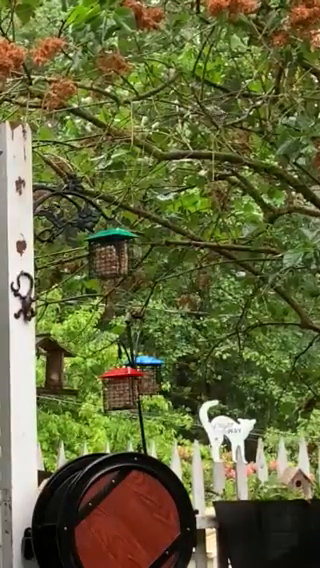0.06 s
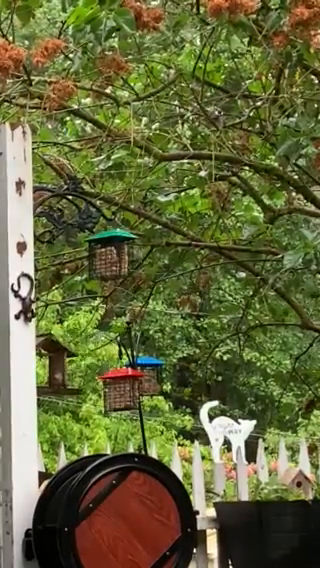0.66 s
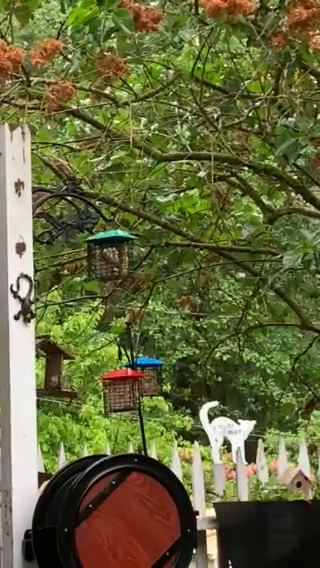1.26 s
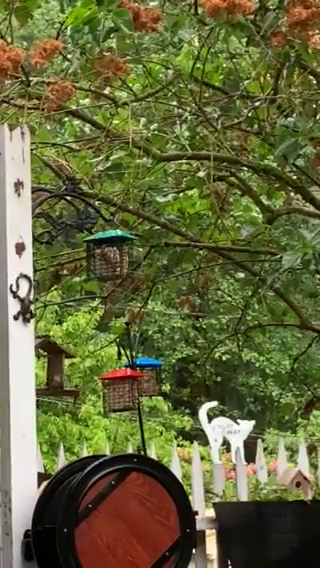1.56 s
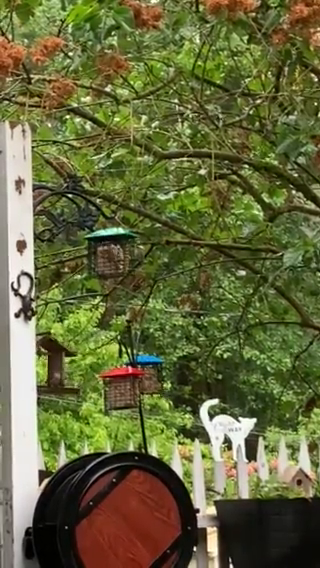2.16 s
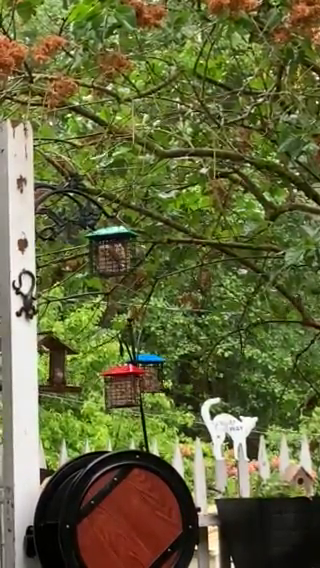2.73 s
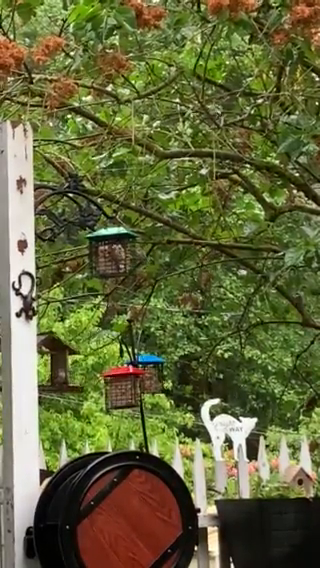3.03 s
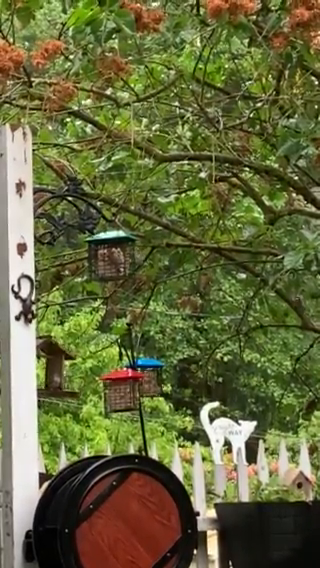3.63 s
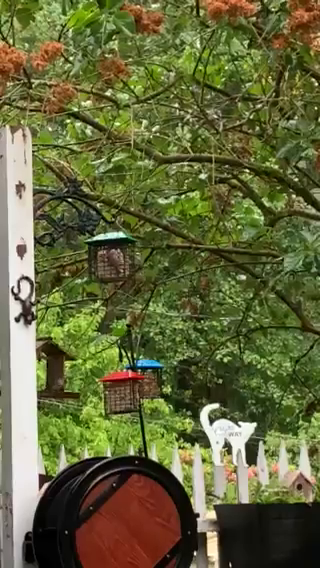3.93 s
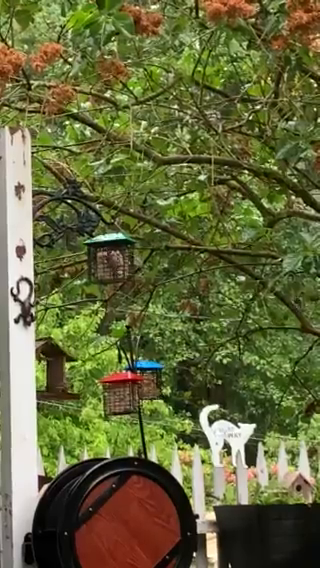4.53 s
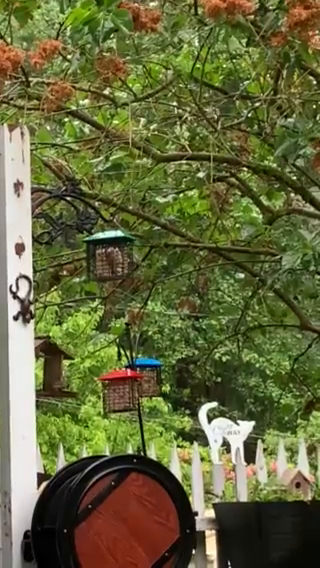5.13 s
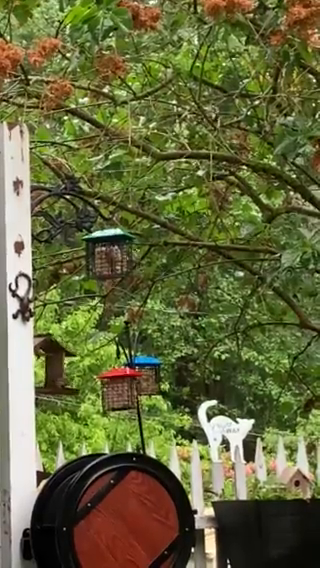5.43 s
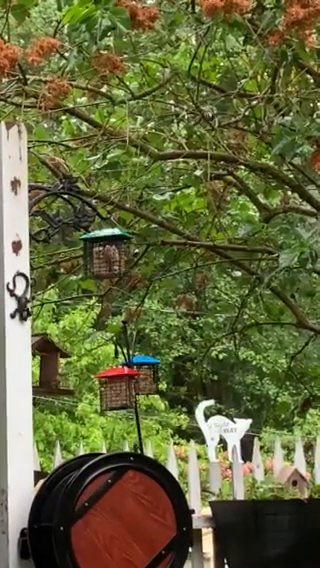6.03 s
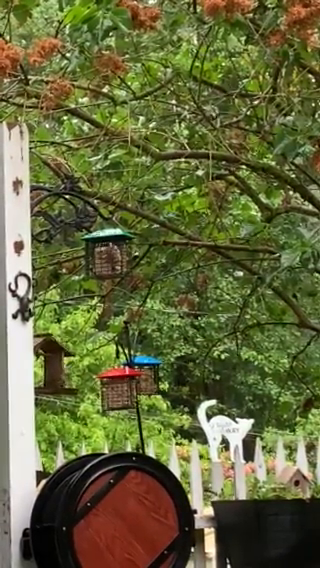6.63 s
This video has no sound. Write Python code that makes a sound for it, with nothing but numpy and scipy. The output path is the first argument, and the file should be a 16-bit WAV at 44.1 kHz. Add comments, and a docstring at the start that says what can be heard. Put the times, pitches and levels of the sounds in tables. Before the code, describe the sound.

Light rain falls steadily in a backyard, an even wash with fine ticks of drops on leaves. About a second and a half in, a small songbird close by gives a quick run of nine high chips, sinking in pitch. Afterwards the rain carries on with sharper drips on a hard hollow surface and small splats, and other birds whistle thinly from the trees near the end. Heard from a porch.

```python
"""A small songbird close to a porch gives one quick falling run of nine chips in steady light rain.
Each chip is an arch of pitch whose harmonics are filtered by throat and beak; other birds call thinly
from the trees. Drops excite damped resonances in leaves and in a hard hollow surface, or burst into
spray, while countless far drops merge into an even wash. One soft low bump sounds just before the run.
Porch, fence and trees reflect the birds and the nearer drops."""
import sys
import numpy as np
from scipy import signal
from scipy.fft import rfft, irfft
from scipy.io import wavfile

SR = 44100
rng = np.random.default_rng(int(sys.argv[2]) if len(sys.argv) > 2 else 0)


def wav_out(sig):
    """Save sig, one row per channel (or a flat mono array), as 16-bit PCM at SR to the path in sys.argv[1]."""
    wavfile.write(sys.argv[1], SR, np.round(np.clip(np.atleast_2d(sig).T, -1, 1) * 32767).astype(np.int16))


N = 298998

# spectral density of distant rain and outdoor rumble: frequency_hz, relative_db
WASH_SPECTRUM = [(20, -45), (32, -24), (42, -1), (65, -0.5), (88, 5), (130, 2), (180, -4.5), (330, -1.5),
                 (480, -3), (760, 1), (1200, -1), (2200, -5), (6300, -10), (7600, -15.5), (11500, -23),
                 (15500, -25)]
# strength of the small drops' ticks by leaf pitch: pitch_hz, relative_db
PATTER_SPECTRUM = [(2500, 1), (4500, 5), (6500, 6.5), (9500, -25), (12000, -15), (15000, 0)]
# colour of bursting spray: frequency_hz, gain_db
SPRAY_SPECTRUM = [(1500, -26), (4000, -5), (7500, 0.5), (10000, 1), (11300, -8), (13200, 1), (15000, -5),
                  (16000, -52)]
# drips from the eave onto one hollow surface: start_s, level_db
EAVE_DRIPS = [(0.0373, -37), (3.8277, -40), (4.3161, -36), (4.8738, -34), (5.1098, -37.5), (5.2165, -36.5),
              (5.3597, -32), (5.9239, -38.5)]
# normal modes of that surface: frequency_hz, gain_db, t60_s
SURFACE_MODES = [(3750, -3, 0.014), (4340, -16, 0.0072), (4660, 1, 0.022), (4970, -2, 0.01),
                 (6000, -24, 0.011), (6510, -1.5, 0.018), (10290, -16, .008)]
# the heaviest drops on leaves: start_s, level_db, pitch_hz
HEAVY_DROPS = [(0.9298, -39, 6560), (1.3234, -36, 6100), (1.3813, -39.5, 6400), (2.2887, -32.5, 6370),
               (2.3865, -41, 3760), (3.9694, -42, 6370), (4.0218, -38, 6240), (4.2482, -33.5, 3670),
               (5.1944, -34.5, 6650), (5.3173, -37, 5960), (6.682, -37.5, 3630)]
# whistles of distant birds: start_s, length_s, middle_pitch_hz, level_db
FAR_WHISTLES = [(1.157, .095, 5370, -55.5), (1.399, 0.051, 6940, -47), (6.269, 0.045, 6510, -46),
                (6.345, 0.027, 5910, -49), (6.380, .09, 8880, -54.5), (6.551, .058, 7340, -44),
                (6.617, .03, 6380, -45.5), (6.731, 0.042, 7960, -47)]
# the near bird's run, sinking as its effort ebbs: start_s, top_pitch_hz
CHIP_RUN = [(1.453, 4114), (1.547, 3874), (1.629, 3740), (1.709, 3700), (1.790, 3708), (1.869, 3670),
            (1.949, 3535), (2.025, 3475), (2.105, 3386)]
# response of throat and beak, favouring the second harmonic: frequency_hz, gain_db
THROAT_RESPONSE = [(2900, -22), (3400, -21), (4200, -21), (5200, 4.5), (7000, -5), (8200, -4),
                   (9200, -13.5), (10700, -18.5), (12900, -24), (14400, -21), (16000, -27)]
# short falling contact notes: start_s, pitch_hz, level_db
CONTACT_NOTES = [(1.513, 2980, -43), (1.754, 2520, -43.5), (2.91, 3600, -46), (4.143, 3600, -45),
                 (4.647, 3590, -46), (6.69, 2860, -41)]
# the nearest drops, bursting on the porch: start_s, level_db
PORCH_SPLATS = [(2.2797, -37), (3.2909, -44), (3.7703, -43), (4.6877, -40), (5.4505, -43), (5.6171, -39),
                (5.8127, -41), (6.3899, -40), (6.577, -36)]
# reflections from the porch's hard surfaces: delay_s, gain_db
PORCH_ECHOES = [(.0032, -5.5), (.0056, -15), (.0076, -18), (0.0097, -26)]


def from_db(db):
    """Amplitude ratio of a level in decibels."""
    return 10 ** (np.asarray(db) / 20)


def rms_one(x):
    """Normalisation to unit rms."""
    return x / np.sqrt(np.mean(x ** 2) + 1e-20)


def peak_one(x):
    """Normalisation to unit peak."""
    return x / abs(x).max()


def gain_at(spectrum, hz):
    """Amplitude gain of a decibel spectrum, interpolated in log frequency."""
    freqs, levels = np.transpose(spectrum)
    return from_db(np.interp(np.log(np.maximum(hz, 1)), np.log(freqs), levels))


def add(track, start_s, sound):
    """Superposition: a sound adds to the track from its start time."""
    start = max(round(start_s * SR), 0)
    track[start:start + len(sound)] += sound[:max(N - start, 0)]


def coloured(x, spectrum):
    """Linear filtering as multiplication of spectra, scaled to unit rms."""
    hz = np.arange(len(x) // 2 + 1) * SR / len(x)
    return rms_one(irfft(rfft(x) * gain_at(spectrum, hz), len(x)))


def ring(force, hz, t60_s):
    """Damped harmonic oscillator: each impulse starts a decaying sine."""
    r, w = from_db(-60 / (t60_s * SR)), 2 * np.pi * hz / SR
    return signal.lfilter([0, np.sin(w)], [1, -2 * r * np.cos(w), r * r], force + 1e-18)


def wobble(size, per_s):
    """Random modulation: straight glides between Gaussian values, per_s of them a second."""
    position = np.arange(size) * per_s / SR
    return np.interp(position, np.arange(400), rng.standard_normal(400))


def rain_wash():
    """Incoherent summation: countless far drops merge into smooth noise."""
    return coloured(rng.standard_normal(N), WASH_SPECTRUM)


def patter(per_s=420, spread_db=5, t60_cycles=14, spray_db=-9, leaves=18):
    """Poisson impacts: small drops, mostly faint, ring leaves of many sizes and throw a little spray."""
    sizes = from_db(spread_db * np.minimum(rng.exponential(1, N), 4)) * rng.choice([-1, 1], N)
    impacts = sizes * (rng.random(N) < per_s / SR)
    leaf_hit = rng.integers(0, leaves, N)
    ticks = np.zeros(N)
    for leaf, hz in enumerate(np.geomspace(2500, 15000, leaves)):
        ringing = ring(impacts * (leaf_hit == leaf), hz, t60_cycles / hz)
        ticks += gain_at(PATTER_SPECTRUM, hz) * rms_one(ringing)
    spray = np.diff(impacts, prepend=0)
    return rms_one(rms_one(ticks) + from_db(spray_db) * rms_one(spray))


def spatter(per_band_per_s=22, spread_db=3.5, decay_s=.003, flurry_db=.5):
    """Band-limited noise bursts in loose flurries: the finer the spray, the higher it hisses."""
    hiss = np.zeros(N)
    for hz in np.geomspace(4500, 13500, 5):
        sizes = from_db(spread_db * np.minimum(rng.exponential(1, N), 2.5))
        impacts = sizes * (rng.random(N) < per_band_per_s / SR)
        envelope = signal.lfilter([1], [1, -np.exp(-1 / (decay_s * SR))], impacts + 1e-18)
        band = signal.butter(1, [.82 * hz, 1.2 * hz], "band", fs=SR, output="sos")
        hiss += signal.sosfilt(band, envelope * rng.standard_normal(N))
    return coloured(hiss, SPRAY_SPECTRUM) * from_db(flurry_db * wobble(N, per_s=7.9))


def splash(decay_s):
    """Broadband transient: a drop breaks up in exponentially decaying noise without bass."""
    t = np.arange(SR // 10) / SR
    burst = rng.standard_normal(len(t)) * np.exp(-t / decay_s)
    return signal.sosfilt(signal.butter(2, 2500, "high", fs=SR, output="sos"), burst)


def drips(splash_db=-4):
    """Modal vibration: every drip excites the same modes of a hollow surface in a new balance."""
    out = np.zeros(N)
    for start_s, level_db in EAVE_DRIPS:
        burst = splash(decay_s=.001)
        body = peak_one(sum(from_db(db) * ring(burst, hz, t60_s) for hz, db, t60_s in SURFACE_MODES))
        add(out, start_s, from_db(level_db) * (body + from_db(splash_db) * peak_one(burst)))
    return out


def lighter_drops(level_db=-43, spread_db=5.5, low_hz=3500, high_hz=8000, count=10):
    """Random impacts on leaves, one in each equal span of time: start_s, level_db, pitch_hz."""
    when, weight, leaf = rng.random((count, 3)).T
    start_s = (np.arange(count) + when) / count * N / SR
    pitch_hz = low_hz * (high_hz / low_hz) ** leaf
    return zip(start_s, level_db + spread_db * (2 * weight - 1), pitch_hz)


def leaf_drops(t60_cycles=24, splash_db=-9, gain_db=.5):
    """Damped resonance: a drop splashes and makes its leaf tick at one pitch."""
    out = np.zeros(N)
    for start_s, level_db, hz in [*HEAVY_DROPS, *lighter_drops()]:
        burst = splash(decay_s=.0012)
        tick = peak_one(ring(burst, hz, t60_cycles / hz))
        add(out, start_s, from_db(level_db + gain_db) * (tick + from_db(splash_db) * peak_one(burst)))
    return out


def swell(u, fade):
    """Amplitude envelope with quarter-sine ends, for a note running from u = -1 to 1."""
    return np.sin(np.pi / 2 * np.clip((1 - abs(u)) / fade, 0, 1))


def whistle(length_s, pitches_hz, jitter, fade):
    """Frequency modulation: an unsteady tone follows a parabola through three pitches."""
    u = np.linspace(-1, 1, round(length_s * SR))
    contour_hz = np.polyval(np.polyfit([-1, 0, 1], pitches_hz, 2), u)
    pitch_hz = contour_hz * (1 + jitter * wobble(len(u), per_s=840))
    return swell(u, fade) * np.sin(2 * np.pi * np.cumsum(pitch_hz) / SR)


def far_birds(rise=.0727, fall=.145):
    """Pitch glides from the trees: a small rise and a deeper fall, made slightly hoarse by jitter."""
    out = np.zeros(N)
    for start_s, length_s, hz, level_db in FAR_WHISTLES:
        note = whistle(length_s, [hz * (1 - rise), hz, hz * (1 - fall)], jitter=.025, fade=.35)
        add(out, start_s, from_db(level_db) * note)
    return out


def low_thud(start_s=1.305, length_s=.067, pitch_hz=62, level_db=-49):
    """Tone burst: a few windowed cycles of a low sine are heard as one soft bump."""
    out = np.zeros(N)
    t = np.arange(round(length_s * SR)) / SR
    add(out, start_s, from_db(level_db) * np.hanning(len(t)) * np.sin(2 * np.pi * pitch_hz * t))
    return out


def near_bird(reference_hz=3700, sag=.0898, flick=.349, jitter=.01, flutter_db=1):
    """Source and filter: the harmonics of each arched chip sweep through the throat's resonances."""
    out = np.zeros(N)
    for i, (start_s, top_hz) in enumerate(CHIP_RUN):
        # lower chips take less effort, so they are shorter and softer
        octaves = np.log2(top_hz / reference_hz)
        length_s = max(.031 + .098 * octaves, .005)
        source_db = -22 + 11 * octaves
        if i == len(CHIP_RUN) - 1:
            source_db -= 3.5  # the last is let go softly
        u = np.linspace(-1, 1, round(length_s * SR))
        arch = 1 - sag * u ** 2 - flick * u ** 8
        # steady and loud on the crest, rough and faint on the flanks
        roughness = jitter * (1 + 8 * u ** 6)
        crest = swell(u, fade=np.where(u < 0, .5, .42))
        pitch_hz = top_hz * arch * (1 + roughness * wobble(len(u), per_s=1986))
        phase = 2 * np.pi * np.cumsum(pitch_hz) / SR
        tone = sum(gain_at(THROAT_RESPONSE, k * pitch_hz) * np.sin(k * phase) for k in range(1, 5))
        effort = crest * from_db(flutter_db * wobble(len(u), per_s=280))
        add(out, start_s, np.sqrt(2) * from_db(source_db) * effort * tone)
    return out


def contact_notes(length_s=.0105, rasp=.93):
    """Fast random amplitude modulation makes brief falling bird notes raspy."""
    out = np.zeros(N)
    for start_s, hz, level_db in CONTACT_NOTES:
        note = whistle(length_s, [1.12 * hz, hz, .9 * hz], jitter=.05, fade=.55)
        add(out, start_s, from_db(level_db) * note * (1 + rasp * wobble(len(note), per_s=2110)))
    return out


def splats(gain_db=-.5):
    """Filtered noise transients: each near drop bursts on the porch with a short bright hiss."""
    out = np.zeros(N)
    for start_s, level_db in PORCH_SPLATS:
        hiss = peak_one(coloured(splash(decay_s=.0039), SPRAY_SPECTRUM))
        add(out, start_s, from_db(level_db + gain_db) * hiss)
    return out


def yard(x, early_db, early_t60_s, late_db, late_t60_s):
    """Reverberation by convolution: porch echoes, early scatter from posts and fence, late from trees."""
    t = np.arange(SR // 2) / SR
    build_up = np.clip(t / .012, 0, 1)
    early, late = rng.standard_normal((2, len(t))) * build_up
    response = from_db(early_db) * rms_one(early * from_db(-60 * t / early_t60_s))
    response += from_db(late_db) * rms_one(late * from_db(-60 * t / late_t60_s))
    response /= np.sqrt(len(t))
    response[0] = 1  # direct sound
    for delay_s, gain_db in PORCH_ECHOES:
        response[round(delay_s * SR)] += from_db(gain_db)
    return signal.fftconvolve(x, response)[:N]


def scene():
    """Direct-to-reverberant ratio: the further a bird, the more of its sound comes by way of the yard."""
    near = yard(near_bird(), early_db=-6.5, early_t60_s=.19, late_db=-9.5, late_t60_s=.2)
    far = yard(far_birds(), early_db=-1, early_t60_s=.08, late_db=-4.5, late_t60_s=.91)
    notes = yard(contact_notes(), early_db=-6.5, early_t60_s=.2, late_db=-4.5, late_t60_s=.29)
    drops = leaf_drops() + drips() + splats() + from_db(-62.5) * patter() + from_db(-67) * spatter()
    rain = yard(drops, early_db=-.5, early_t60_s=.1, late_db=-9, late_t60_s=.42)
    rain += from_db(-51) * rain_wash()
    return (near + far + notes + rain + low_thud())[None]


def record(dry, cutoff_hz=15850):
    """Band limiting: an elliptic low-pass filter cuts the top steeply."""
    return signal.sosfilt(signal.ellip(12, .1, 80, cutoff_hz, fs=SR, output="sos"), dry)


dry = scene()
out = record(dry)
wav_out(out)
```